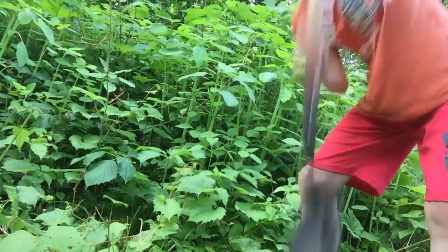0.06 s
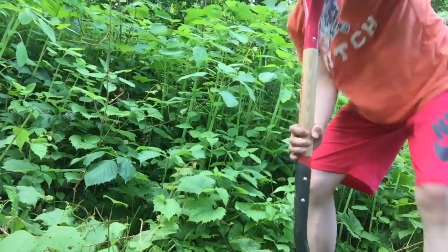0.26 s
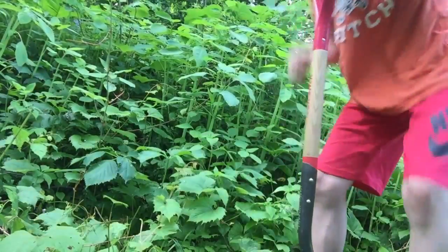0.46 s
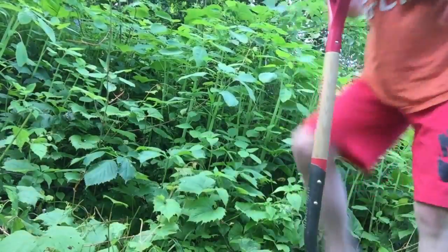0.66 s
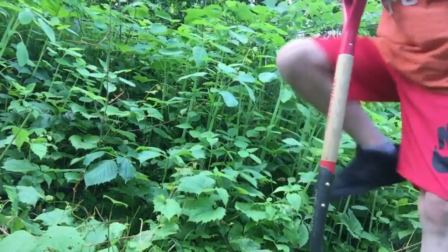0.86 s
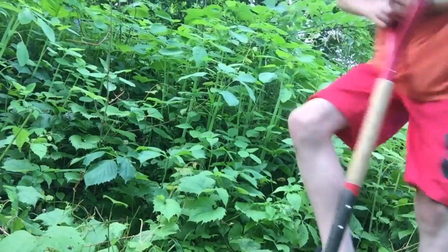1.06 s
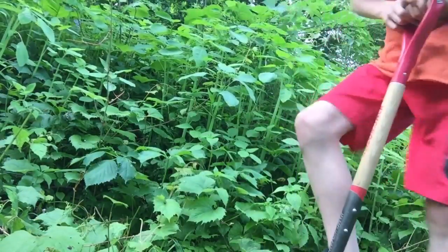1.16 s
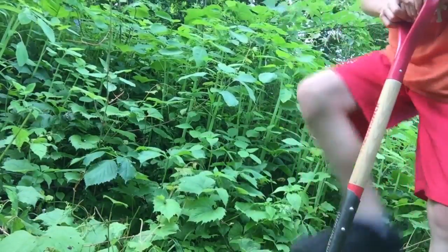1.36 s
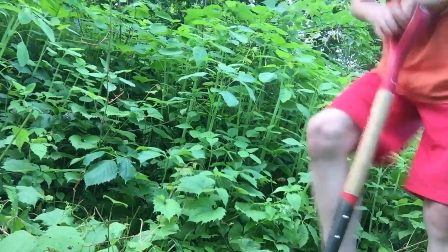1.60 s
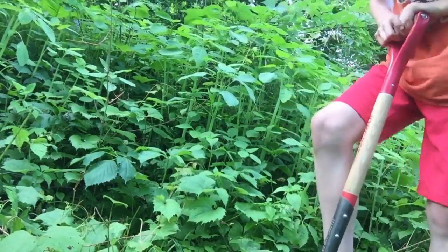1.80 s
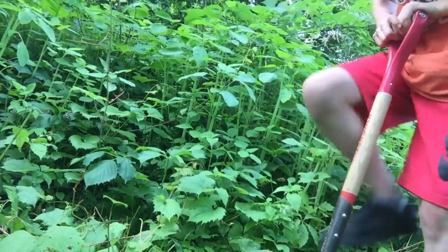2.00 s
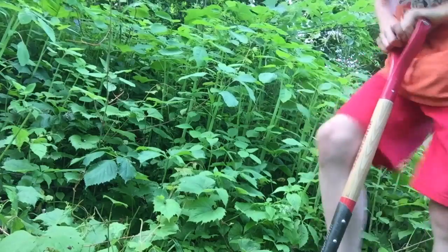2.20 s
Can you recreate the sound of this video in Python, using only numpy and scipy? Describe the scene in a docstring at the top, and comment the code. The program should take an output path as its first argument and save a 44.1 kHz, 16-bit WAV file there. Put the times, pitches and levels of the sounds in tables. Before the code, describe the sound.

A steel shovel bites stony soil with a sharp gritty crunch, then two foot kicks drive it deeper with dull thuds and short clanks; crumbs trickle between blows. Close, dry, mono, quiet outdoor air and faint low rumble.

```python
"""A steel shovel is stabbed into stony ground close by, then driven deeper by two kicks.
Filtered click streams make grit crunch, crumbs trickle and stones tick; decaying modes ring the blade, and
short low swings thud in the soil. Between blows the steel scrapes, leaves rustle, a stalk snaps and shoes scuff.
Outdoors: filtered noise for soft air and a low rumble, a distant engine of wavering pitch (two harmonics)
and two faint high chirps (falling sines)."""
import sys
import numpy as np
from scipy import signal
from scipy.fft import rfft, irfft
from scipy.io import wavfile
from scipy.ndimage import uniform_filter1d

SR = 44100
rng = np.random.default_rng(int(sys.argv[2]) if len(sys.argv) > 2 else 0)


def output_pcm(signal):
    """Save a mono or channel-first signal as 16-bit PCM at the path in sys.argv[1].

    Samples are clipped to [-1, 1] before scaling.
    """
    pcm = np.clip(np.atleast_2d(signal).T, -1, 1) * 32767
    wavfile.write(sys.argv[1], SR, np.round(pcm).astype(np.int16))


N = 99225
T = np.arange(N) / SR  # seconds
GRAINS_PER_S, GRAIN_SPREAD_DB = 16000, 0.58  # dense grit


def undb(db):
    """Decibels to gain."""
    return 10 ** (np.asarray(db) / 20)


def unit(x):
    """Scale to rms 1."""
    return x / np.sqrt(np.mean(x ** 2))


def colour(x, points, tilt_db=0):
    """Shape a steady sound by a spectrum, tilted in dB per octave, and scale it to rms 1."""
    octave = np.log2(np.maximum(np.fft.rfftfreq(N, 1 / SR), 1))
    hz, db = np.array(points).T
    shape = np.interp(octave, np.log2(hz), db)
    tilt = tilt_db * np.clip(octave, np.log2(hz[0]), np.log2(hz[-1]))
    low_cut = np.clip(2 ** octave / hz[0], 0, 1) ** 2  # 12 dB per octave below the first point
    return unit(irfft(rfft(x) * undb(shape + tilt) * low_cut, N))


def envelope(start, rise, hold, fall):
    """Swell exponentially up to the start, hold, then fall in dB per second."""
    swell = np.exp(np.minimum(T - start, 0) / max(rise / 2, 1 / SR))
    return swell * undb(-abs(fall) * np.maximum(T - start - hold, 0))


def walk(rate):
    """Slow random drift of rms 1, from random steps (rate per second) smoothed twice."""
    k = int(SR / rate)
    steps = np.repeat(rng.standard_normal(N // k + 1), k)
    return unit(uniform_filter1d(uniform_filter1d(steps, k), k)[:N])


def grains(rate, spread_db):
    """A random stream of tiny clicks (rate per second) of either sign and uneven size, at rms 1."""
    size = undb(spread_db * np.minimum(rng.exponential(size=N), 4))
    return unit((rng.random(N) < rate / SR) * rng.choice([-1, 1], N) * size)


def ring(x, modes):
    """Drive a set of decaying modes (Hz, dB, t60 in s); neighbours swing in opposite directions."""
    t = T[:SR // 4]
    response = np.zeros(len(t))
    for k, (hz, db, t60) in enumerate(modes):
        response += (-1) ** k * undb(db - 60 * t / t60) * np.sin(2 * np.pi * hz * t)
    return signal.fftconvolve(x, response / np.linalg.norm(response))[:N]


# Spectrum of the soft outdoor air. Each row: frequency in Hz, relative density in dB per Hz.
AIR_SPECTRUM = [(150, -27), (250, -6), (330, -8), (420, -12), (600, -7.5), (780, -7), (980, -2),
                (1150, -5.5), (1400, -11.5), (2000, -14), (4000, -19.5), (9500, -27.5), (11500, -31),
                (16000, -34.5)]
AIR_DB = -61.5


def soft_air():
    """Steady coloured noise whose level drifts slightly."""
    return colour(rng.standard_normal(N), AIR_SPECTRUM) * undb(AIR_DB + 0.2 * walk(5.08))


# Spectrum of the low outdoor rumble. Each row: frequency in Hz, relative density in dB per Hz.
RUMBLE_SPECTRUM = [(20, -44), (40, -11.5), (60, -2.5), (80, 1.5), (130, 0.5), (175, -9), (240, -12),
                   (320, -38.5), (600, -53.5)]
RUMBLE_DB, RUMBLE_WANDER_DB = -53, 1.6


def low_rumble():
    """Low coloured noise with an uneven level."""
    return colour(rng.standard_normal(N), RUMBLE_SPECTRUM) * undb(RUMBLE_DB + RUMBLE_WANDER_DB * walk(22.3))


# Distant engine. Each row: time in seconds, firing rate in Hz, level in dB.
ENGINE_COURSE = [(0, 71.6, -58.5), (.6, 75, -67), (1.3, 66, -62), (1.6, 67.97, -51.5), (1.85, 70.64, -51),
                 (1.97, 72.9, -55), (2.03, 76, -45.5), (2.17, 76.4, -49), (2.25, 72.6, -55.5)]


def distant_engine():
    """The firing tone and a weak second harmonic follow the course with small drifts in pitch and level."""
    times, hz, db = np.array(ENGINE_COURSE).T
    firing_hz = np.interp(T, times, hz) * (1 + 0.006 * walk(15))
    phase = 2 * np.pi * np.cumsum(firing_hz) / SR
    tone = unit(np.sin(phase) + undb(-22.5) * np.sin(2 * phase))
    return tone * undb(np.interp(T, times, db) + 0.4 * walk(15.7))


# Leaves brush the shovel and the shoe.
# Each row: start in seconds, level in dB, rise in seconds, hold in seconds, fall in dB per second.
LEAF_BRUSHES = [(0.209, -59.5, 0.026, .005, 496), (0.383, -70.5, 0.031, 0.29, 199.5),
                (1.675, -60.5, 0.067, 0.0055, 500), (2.243, -61.5, .006, 0.0094, 300)]
# Spectrum shared by leaves and crumbs. Each row: frequency in Hz, relative density in dB per Hz.
CRUMB_SPECTRUM = [(150, -18.5), (400, 2), (1500, -1.5), (3000, -1), (6000, -6.5), (10000, -7.5),
                  (16000, -17.5)]


def rustling_leaves():
    """Streams of uneven small clicks swell and fade as the digger moves."""
    leaves = colour(grains(2500, 2.3), CRUMB_SPECTRUM)
    return sum(leaves * undb(db) * envelope(start, rise, hold, fall)
               for start, db, rise, hold, fall in LEAF_BRUSHES)


# Blade meets ground, one row per blow. Each row: start in seconds, level in dB, hold in seconds,
# fall in dB per second, share of the blade's ring time that the soil leaves.
GROUND_CONTACTS = [(0.214, -39, 0.0021, 707, 0.8), (1.077, -31.5, .012, 598, 1),
                   (1.6752, -31.5, 0.017, 900, 0.49)]
# Grit shears along the blade. Each row: start in seconds, level in dB, rise in seconds, hold in seconds,
# fall in dB per second, tilt in dB per octave, blade ring in dB relative to the crunch.
GRIT_CRUNCHES = [(0.2177, -18.5, 0.0017, 0.0012, 1004, -1.5, -4),
                 (0.2269, -31, 0.0012, 0.0019, 902, -4, -2), (1.081, -34.5, 0.0068, 0.0056, 594, -5.5, -8),
                 (1.0918, -23.5, 0.0043, 0.003, 801, -3, -1), (1.6795, -37, 0.00074, 0.0028, 900, -6.5, -3),
                 (1.6863, -27, 0.0029, 0.0014, 958, -3, -1), (1.6924, -29, .001, .002, 1200, 10.5, -8)]
# Blade modes, which answer differently as it sinks. Each row: frequency in Hz, t60 in seconds before
# the soil's share, relative levels in dB in the first, second and third blow.
BLADE_MODES = [(1010, 0.031, -4.5, -0.5, 2), (1535, 0.046, -7, 0, -27), (1805, 0.034, 1.5, -6, -2),
               (1886, 0.014, 0.5, 5, -21), (2580, 0.03, -5, -5, 10), (2699, 0.034, -2.5, 2, 5.5),
               (2930, 0.02, -20, -7, -26), (3753, 0.037, -12.5, -6, 1), (4280, 0.042, -6.5, -16, -17),
               (4480, 0.02, -24, 4.5, -31), (6210, 0.029, -0.5, -12, -0.5), (6820, 0.036, 2, -20, -13),
               (6570, 0.0574, -38.5, -32, -19), (8570, 0.043, -10, -11, -22), (9260, 0.026, -23, -4, -11),
               (9616, 0.061, -12, -27, -18), (9990, 0.042, -22, 3.5, -17)]
# Spectrum used for the grit on steel, with narrow dips near 10.3 and 14.3 kHz set into it. Each row: frequency
# in Hz, relative # density in dB per Hz.
GRIT_SPECTRUM = [(200, -3), (600, -9), (1400, -8.5), (3000, 2), (5000, 1), (7500, 5.5), (9600, 5.5),
                 (10300, -2.5), (11200, 5), (13000, 2), (14300, -4.5), (16000, 5.5)]
# Spectrum of soil on steel. Each row: frequency in Hz, relative density in dB per Hz.
SOIL_SPECTRUM = [(60, -21), (200, -6.5), (450, 2.5), (700, -3.5), (1100, 1), (1700, 0), (2800, -7),
                 (6000, -23), (16000, -51)]
STRIKE_DB, RUB_DB = 23, -10  # blade driven by the jolt against a stone and by rubbing grit


def stabs():
    """A dull contact, then crunches of grit; each jolt and the rubbing grit ring the soil-damped blade."""
    out, drive = np.zeros(N), np.zeros((len(GROUND_CONTACTS), N))
    grit = grains(GRAINS_PER_S, GRAIN_SPREAD_DB)
    for start, db, rise, hold, fall, tilt_db, ring_db in GRIT_CRUNCHES:
        crunch = colour(grit, GRIT_SPECTRUM, tilt_db) * undb(db) * envelope(start, rise, hold, fall)
        out += crunch
        blow = np.argmin([abs(start - row[0]) for row in GROUND_CONTACTS])  # nearest in time
        drive[blow] += crunch * undb(ring_db + RUB_DB)
        drive[blow, int(start * SR)] += undb(db + ring_db + STRIKE_DB)
    soil = colour(grains(GRAINS_PER_S, GRAIN_SPREAD_DB), SOIL_SPECTRUM)
    for blow, (start, db, hold, fall, ring_share) in enumerate(GROUND_CONTACTS):
        out += soil * undb(db) * envelope(start, 0.00033, hold, fall)
        modes = [(hz, levels[blow], t60 * ring_share) for hz, t60, *levels in BLADE_MODES]
        out += ring(drive[blow], modes)
    return out


# Soil gives under the blow. Each row: start in seconds, pitch in Hz, level in dB, swell in seconds.
SOIL_THUDS = [(0.2159, 322, -33, .004), (.226, 388, -35, 0.0031), (0.2356, 357, -26, 0.0049),
              (.238, 110, -30, 0.0056), (.243, 58, -42, 0.011), (1.08, 118, -25, .008),
              (1.077, 337, -32, 0.0059), (1.6765, 685, -27.5, 0.0029), (1.6765, 241, -24, .006),
              (1.679, 115, -26.5, 0.0098)]


def thuds():
    """Low, heavily damped swings of the shovel in the soil, strongest one swell time after the start."""
    out = np.zeros(N)
    for start, hz, db, swell in SOIL_THUDS:
        age = np.maximum(T - start, 0)
        pulse = (age / swell) ** 2 * np.exp(2 - 2 * age / swell)
        out += undb(db) * pulse * np.sin(2 * np.pi * hz * age)
    return out


# Crumbs settle after each blow.
# Each row: start in seconds, level in dB, hold in seconds, fall in dB per second.
CRUMB_FALLS = [(0.223, -50, 0.029, 158), (1.139, -54.5, 0.031, 140), (1.699, -57, 0.06, 207)]
CRUMB_SPREAD_DB = 2


def settling_crumbs():
    """Crumbs trickle as a stream of small uneven clicks that dies away."""
    trickle = colour(grains(3500, CRUMB_SPREAD_DB), CRUMB_SPECTRUM)
    return sum(trickle * undb(db) * envelope(start, 0.0033, hold, fall)
               for start, db, hold, fall in CRUMB_FALLS)


# Single stones tick on the steel.
# Each row: start in seconds, level in dB, fall in dB per second, tilt in dB per octave.
STONE_TICKS = [(0.2659, -40, 3000, 1), (0.2882, -42, 2600, -5.5), (0.479, -57, 700, -1.5),
               (0.578, -61, 600, -4.5), (0.623, -58.5, 404, -6), (0.652, -58, 500, -6),
               (1.146, -44.5, 2000, -4), (1.221, -53.5, 502, 1), (1.7672, -52.5, 1600, -4)]


def stone_ticks():
    """Each stone is a very short burst of grit, tilted duller or brighter."""
    chips = grains(GRAINS_PER_S, GRAIN_SPREAD_DB)
    return sum(colour(chips, GRIT_SPECTRUM, tilt_db) * undb(db) * envelope(start, 0.0005, 0.00044, fall)
               for start, db, fall, tilt_db in STONE_TICKS)


# The shoe shuffles on soil. Each row: start in seconds, level in dB, hold in seconds.
SHOE_SHUFFLES = [(0.622, -64, 0.045), (1.341, -67, .06)]
# Spectrum of the scuffing shoe. Each row: frequency in Hz, relative density in dB per Hz.
SHUFFLE_SPECTRUM = [(200, -10), (400, -6), (700, -8), (1100, 7), (1700, -11), (4000, -11), (10000, -20)]


def shuffles():
    """Soft grainy scuffs as the weight shifts from foot to foot."""
    scuff = colour(grains(2200, 1.8), SHUFFLE_SPECTRUM)
    return sum(scuff * undb(db) * envelope(start, 0.02, hold, 320) for start, db, hold in SHOE_SHUFFLES)


# Steel rubbing on a stone. Each row: frequency in Hz, relative level in dB, t60 in seconds.
STONE_RUB_MODES = [(475, -8, .04), (1764, -2, 0.065), (1930, -3, 0.015), (2330, -3.5, 0.021),
                   (5530, -13, 0.031)]
SCRAPE_S, SCRAPE_DB = 1.186, -51


def scrape():
    """The blade slips along a stone after the first kick: slips ring the steel, with a rough rasp."""
    slip = grains(1500, 1.5) * envelope(SCRAPE_S, 0.083, 0.016, 500)
    rasp = colour(grains(3000, 2.5), SOIL_SPECTRUM) * envelope(SCRAPE_S, 0.032, 0.039, 280)
    return undb(SCRAPE_DB) * (ring(slip, STONE_RUB_MODES) + undb(-5.5) * rasp)


# Spectrum of a snapping dry stalk. Each row: frequency in Hz, relative density in dB per Hz.
SNAP_SPECTRUM = [(1500, -12), (3500, -16), (6100, -2), (7400, -19.5), (9100, 0.5), (10400, -11), (11200, 2),
                 (12600, -14), (13800, -10), (15700, 1)]
SNAP_S, SNAP_DB, SNAP_FALL_DB_PER_S = 1.3626, -37.5, 2800
SNAP_TAIL_DB, SNAP_TAIL_DB_PER_S = -8.5, 950  # tail level is relative to the crack


def stalk_snap():
    """A dry stalk cracks: a sharp burst of clicks with a weaker, slower tail."""
    crack = envelope(SNAP_S, 0.0004, 0.00034, SNAP_FALL_DB_PER_S)
    tail = undb(SNAP_TAIL_DB) * envelope(SNAP_S, 0.0003, 0.003, SNAP_TAIL_DB_PER_S)
    splinters = colour(grains(GRAINS_PER_S, GRAIN_SPREAD_DB), SNAP_SPECTRUM)
    return splinters * undb(SNAP_DB) * (crack + tail)


# Faint high chirps. Each row: start in seconds, pitch in Hz, level in dB.
HIGH_CHIRPS = [(1.86, 12930, -71), (2.03, 11650, -70)]
CHIRP_SAG_HZ_PER_S = 2500


def chirps():
    """Thin sines whose pitch sags and trembles rapidly."""
    out = np.zeros(N)
    for start, pitch, db in HIGH_CHIRPS:
        glide_hz = pitch - CHIRP_SAG_HZ_PER_S * (T - start) + 260 * walk(900)
        tone = np.sin(2 * np.pi * np.cumsum(glide_hz) / SR)
        out += tone * undb(db) * envelope(start, 0.024, 0.025, 300)
    return out


def scene():
    """The digging, close by, over the outdoor background, on one channel."""
    digging = stabs() + thuds() + settling_crumbs() + stone_ticks() + scrape()
    digger = rustling_leaves() + stalk_snap() + shuffles()
    outdoors = soft_air() + low_rumble() + distant_engine() + chirps()
    return (digging + digger + outdoors)[None]


TOP_HZ = 15750


def record(dry):
    """The recorder cuts the top with a steep elliptic low-pass (0.2 dB ripple, 70 dB stop)."""
    return signal.sosfilt(signal.ellip(10, 0.2, 70, TOP_HZ, fs=SR, output="sos"), dry)


dry = scene()
out = record(dry)
output_pcm(out)
```